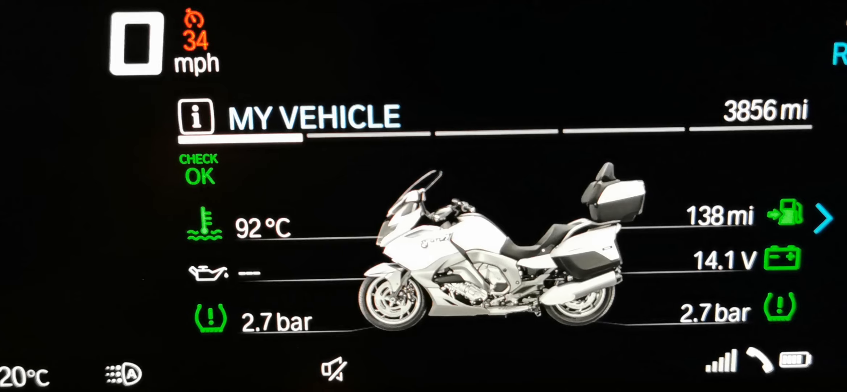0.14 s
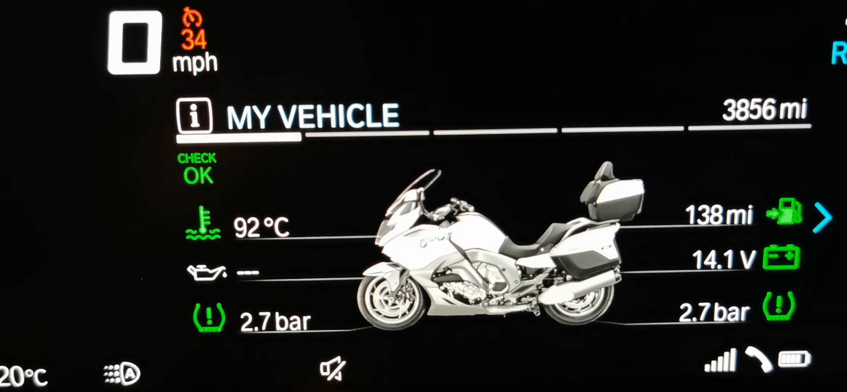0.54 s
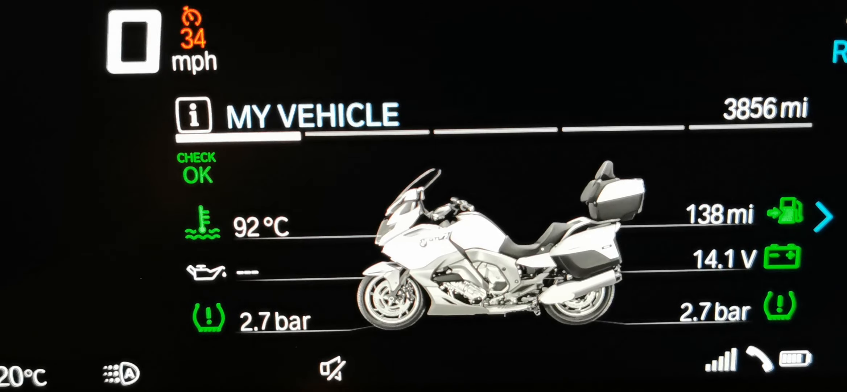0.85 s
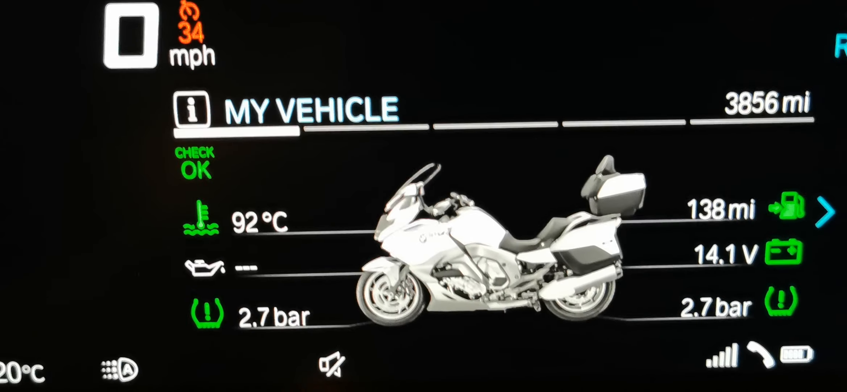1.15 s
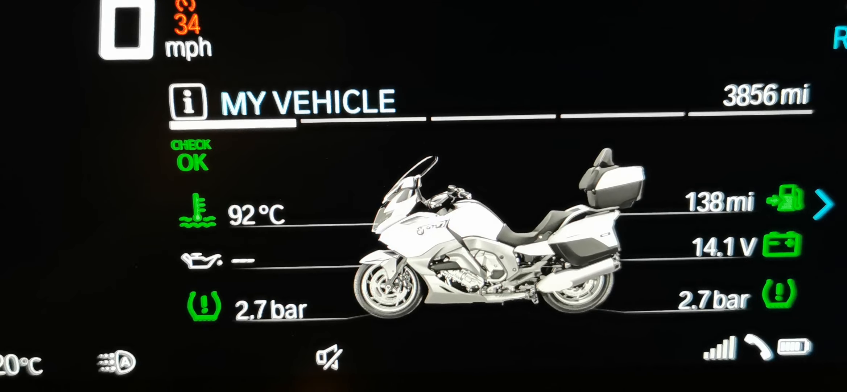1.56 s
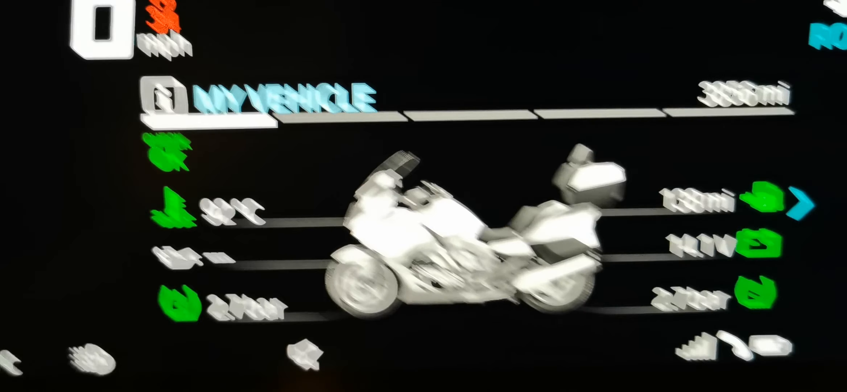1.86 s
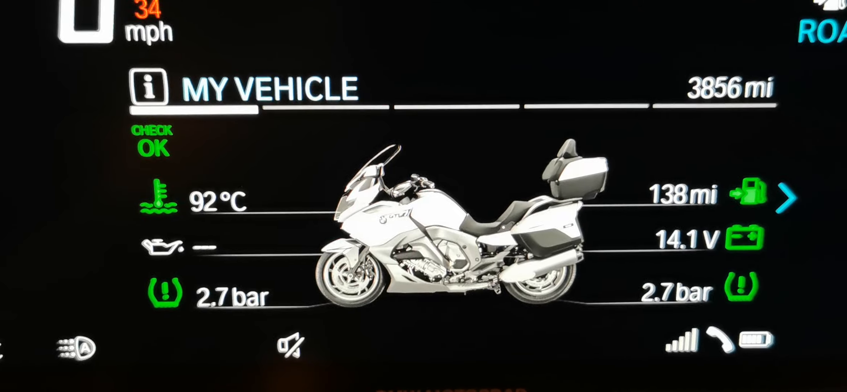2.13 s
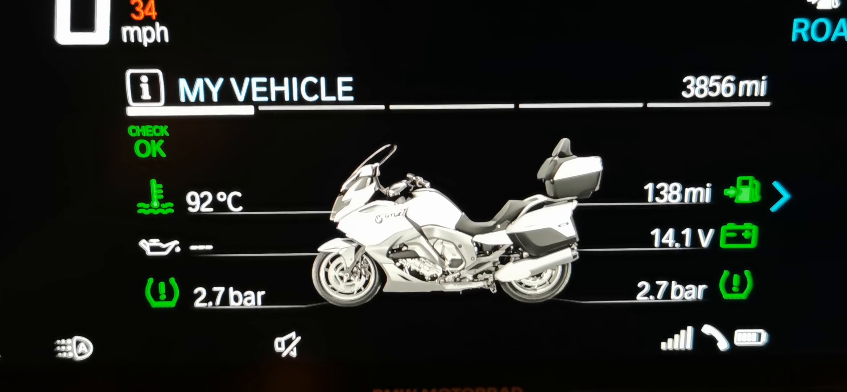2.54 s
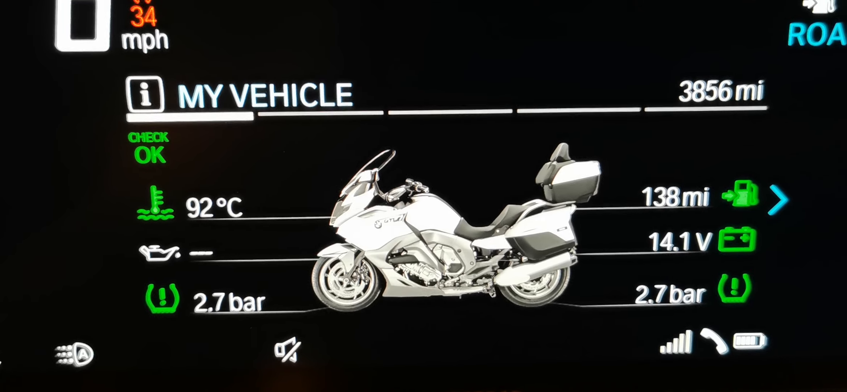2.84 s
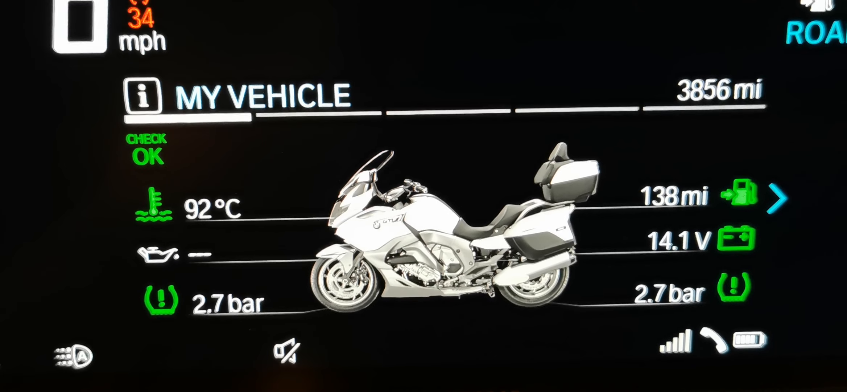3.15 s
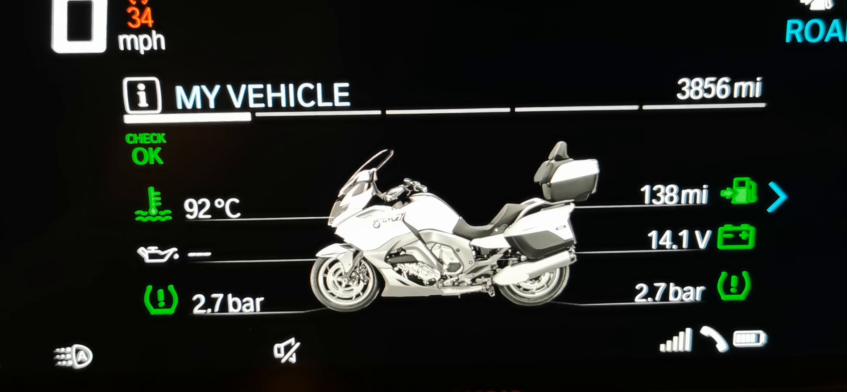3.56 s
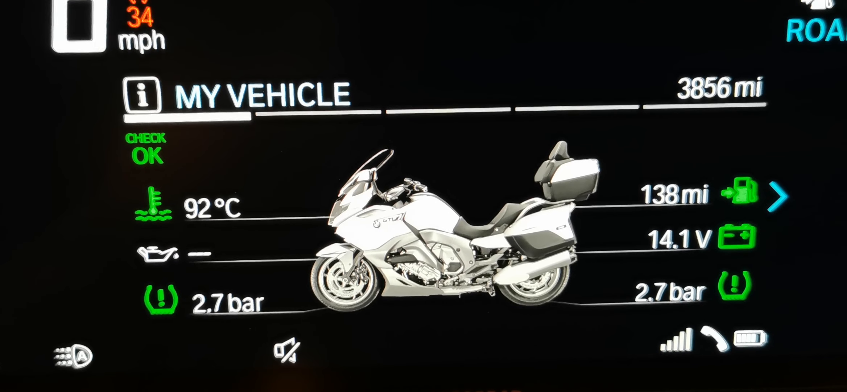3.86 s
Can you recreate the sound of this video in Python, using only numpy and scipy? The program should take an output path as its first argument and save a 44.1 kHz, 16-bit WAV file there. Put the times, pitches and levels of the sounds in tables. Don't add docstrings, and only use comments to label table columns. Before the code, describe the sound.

Silence until about 0.34 seconds, then a large six-cylinder motorcycle idle cuts in abruptly, already running. A smooth low exhaust hum fires about 45 times a second, with a hollow intake throb looping seven or eight times a second. Dense metallic valve rattle, soft injector ticks and gear whirr sit above. It is slightly louder from about 0.55, then drifts subtly closer and rightward after 1.4, idling steadily until 4 seconds.

```python
import sys
import numpy as np
from scipy import signal
from scipy.fft import rfft, irfft
from scipy.io import wavfile
from scipy.ndimage import uniform_filter1d

SR = 44100
rng = np.random.default_rng(int(sys.argv[2]) if len(sys.argv) > 2 else 0)


def magnitude_from_level(level_db):
    exponent = np.asarray(level_db, float) / 20
    return 10 ** exponent


def wav_record(signal):
    frames = np.transpose(np.atleast_2d(signal))
    bounded = np.clip(frames, -1, 1)
    quanta = np.round(bounded * 32767).astype(np.int16)
    wavfile.write(sys.argv[1], SR, quanta)


N = 176400
CYCLE_HZ, CYLINDERS = 7.4969, 6
PORT_LAG_S = .00028


def unit(x):
    return x / np.sqrt(np.mean(x ** 2))


def ring(x, hz, width_hz):
    return signal.lfilter(*signal.iirpeak(hz, hz / width_hz, fs=SR), x)


def walk(rate_hz):
    hold = int(SR / rate_hz)
    steps = np.repeat(rng.standard_normal(N // hold + 1), hold)
    smooth = uniform_filter1d(uniform_filter1d(steps, hold), hold)
    return unit(smooth[:N])


def curve(table, hz):
    table = np.array(table, float)
    return np.interp(np.log(hz + 1), np.log(table[:, 0] + 1), table[:, 1])


def sides(lean_db):
    return magnitude_from_level(np.array([lean_db / 2, -lean_db / 2]))


def ports(x, lean_db):
    return np.array([np.roll(x, int(PORT_LAG_S * SR)), x]) * sides(lean_db)[:, None]


# f/Hz, share/0-1
SHARED = [(30, 1), (400, .99), (750, .85), (1400, .75), (3000, .6), (6000, .45), (10000, .15)]


def pair(gate, hz, lag_s):
    right, own = rng.standard_normal((2, N))
    share = np.clip(curve(SHARED, hz), 0, 1)
    left = share * np.roll(right, int(lag_s * SR)) + np.sqrt(1 - share ** 2) * own
    return gate * np.array([left, right])


def firings(turns, cylinder_db, scatter_db, lead_s):
    count = np.floor(CYLINDERS * (turns + lead_s * CYCLE_HZ)).astype(int)
    at = np.flatnonzero(np.diff(count)) + 1
    level_db = np.array(cylinder_db)[count[at] % CYLINDERS]
    out = np.zeros(N)
    out[at] = magnitude_from_level(level_db + scatter_db * rng.standard_normal(len(at)))
    return out


def smear(x, rise_s, fall_s):
    t = np.arange(SR // 20) / SR
    shape = np.exp(-t / fall_s) * (1 - np.exp(-t / rise_s))
    return signal.fftconvolve(x, shape / shape.max())[:N]


KNOCK_DB = [-1.6, 0.11, -1, 0, -0.88, -.3]
# f/Hz, level/dB per Hz
WHIRR = [(25, -15), (250, -7), (600, -12), (1400, -16), (2500, -20.5), (6800, -29.5), (7700, -34),
         (15700, -36)]
# f/Hz, L-R/dB
WHIRR_LEAN = [(60, 13), (350, -17), (700, 4), (1290, -4), (2380, -7), (4400, -1), (8120, -0.5),
              (15000, -1.5)]


def whirr(turns):
    level_db, flicker_db = -28, 1
    hz = np.fft.rfftfreq(N, 1 / SR)
    tilt = magnitude_from_level(curve(WHIRR, hz)) * sides(curve(WHIRR_LEAN, hz))
    gate = 0.5 + 0.1 * smear(firings(turns, KNOCK_DB, 1.9, 0.0036), 0.00063, 0.0044)
    out = 0
    for centre_hz in 30 * 2. ** np.arange(10):
        band = np.clip(1 - np.abs(np.log2(hz / centre_hz + 1e-9)), 0, 1) ** .5
        spec = rfft(pair(gate, centre_hz, PORT_LAG_S))
        out = out + magnitude_from_level(flicker_db * walk(12)) * irfft(spec * band * tilt, N)
    return magnitude_from_level(level_db) * unit(out)


TICK_DB = [-8, -6.5, -4, -5.2, -2.5, -5.7]
# f/Hz, width/Hz, level/dB, L-R/dB
TICK_RINGS = [(3900, 70, -55.5, 0), (5124, 130, -56.5, -9.5), (5270, 2550, -53, -14.5),
              (8950, 1260, -54.5, 10.5), (10840, 890, -60, -5), (13300, 900, -54.5, -.7),
              (14600, 900, -59, -1)]


def injectors(turns):
    ticks = firings(turns, TICK_DB, scatter_db=2, lead_s=.0017)
    gate = smear(ticks, rise_s=.001, fall_s=.007)
    out = 0
    for hz, width_hz, db, lean_db in TICK_RINGS:
        hiss = pair(gate, hz, PORT_LAG_S)
        rung = ring(ring(hiss, hz, width_hz), hz, width_hz)
        out = out + magnitude_from_level(db) * sides(lean_db)[:, None] * unit(rung)
    return out


# f/Hz, width/Hz, level/dB, L-R/dB
CASING = [(557, 26, -43, -2), (664, 37, -36.5, -0.5), (742, 28, -41.5, 2), (860, 18, -44.5, -10),
          (928, 43, -50.5, -10), (1118, 26, -60, -6), (1824.4, 66, -36.5, -4.5), (1895, 59, -46.5, 3),
          (2010, 250, -44, -13), (2280, 45, -47, -16), (2685, 38, -44.5, 4), (3554, 120, -50, 0),
          (4450, 33, -51.5, -7), (6580, 210, -51, 4)]


def casing(turns):
    rattle_per_s, spread_db, drift_db = 1500, 1.5, .8
    knock_depth, knock_fall_s = .8, 0.0053
    hits = (rng.random(N) < rattle_per_s / SR) * magnitude_from_level(spread_db * rng.exponential(size=N))
    knocks = smear(firings(turns, KNOCK_DB, 1.6, 0.0014), .001, knock_fall_s)
    gate = uniform_filter1d(hits, size=12) * (3.5 + knock_depth * knocks)
    out = 0
    for hz, width_hz, db, lean_db in CASING:
        level = magnitude_from_level(db + drift_db * walk(2.33))
        strike = pair(gate, hz, PORT_LAG_S * rng.uniform(0.65, 1.5))
        out = out + level * sides(lean_db)[:, None] * unit(ring(strike, hz, width_hz))
    return out


# place in cycle/0-1, f/Hz, swell/s, fall/s, level/dB
BOOM = [
    (1, 355, 0.016, 0.0065, -19),
    (.27, 358, .016, 0.0023, -28),
    (.66, 407, 0.0037, 0.0045, -37),
]


def airbox(turns):
    scatter_db, jitter_s, glide_hz_per_s = 1.1, .00025, 800
    drone_db, drone_order, lean_db = -36, 48, 5
    out = 0
    for place, hz, swell_s, fall_s, db in BOOM:
        cycle = np.round(turns - place).astype(int)
        late, loud = rng.standard_normal((N // 4000, 2))[cycle - cycle.min()].T
        t = (turns - place - cycle) / CYCLE_HZ + jitter_s * late
        shape = 2 / (np.exp(-t / swell_s) + np.exp(t / fall_s))
        tone = np.cos(2 * np.pi * t * (hz + glide_hz_per_s * t / 2))
        out = out + magnitude_from_level(db + scatter_db * loud) * shape * tone
    drone = np.cos(2 * np.pi * drone_order * (turns - BOOM[0][0]))
    return ports(out + magnitude_from_level(drone_db + 2 * walk(11.25)) * drone, lean_db)


# f/Hz, width/Hz, level/dB
PIPE = [(74, 25, -7), (150, 8.4, -1.5), (185, 22.5, -4), (228, 56, -6.5), (257, 26, -2.5),
        (315, 17.6, -4.5), (415, 20, -0.5), (491.7, 33, -2)]


def pipe(x):
    out = 0
    for k, (hz, width_hz, db) in enumerate(PIPE):
        out = out + (-1) ** k * magnitude_from_level(db) * ring(ring(x, hz, width_hz), hz, 2 * width_hz)
    return unit(out)


# multiple of firing rate, level/dB
HUM = [(1, -14.5), (2, 0), (3, -13), (4, -4.5), (5, -8), (6, -14), (7, -15)]
PUFF_DB = [-1.5, -5.5, 1, -22, 0, 1.5]


def exhaust(turns):
    hum_db, puffs_db, rumble_db, lean_db = -28.5, -37, -32, 4
    sway_db, lope_db, lope_turn = .8, 1.2, .05
    flutter_db, wobble_rad, edge_rad = .8, .07, 0.82
    angle = 2 * np.pi * CYLINDERS * turns - edge_rad
    sway = sway_db * walk(5.9) + lope_db * np.cos(2 * np.pi * (turns - lope_turn))
    hum = 0
    for k, db in HUM:
        level = magnitude_from_level(db + sway + flutter_db * k ** .3 * walk(14))
        hum = hum - level * np.sqrt(2) * np.sin(k * (angle + wobble_rad * walk(12)))
    puffs = firings(turns, PUFF_DB, scatter_db=2, lead_s=-0.0018)
    uneven = puffs - (puffs > 0) * puffs[puffs > 0].mean()
    flow = rng.standard_normal(N)
    return ports(magnitude_from_level(hum_db) * hum + magnitude_from_level(puffs_db) * pipe(uneven) + magnitude_from_level(rumble_db) * pipe(flow), lean_db)


# t/s, closeness/dB, L-R/dB
HAND = [
    (.34, -4, -1.5),
    (.47, -4, -1),
    (.55, -1.5, 2),
    (1.4, -1.5, 2),
    (2.1, -0.7, -0.6),
    (2.8, -0.5, -0.9),
    (3.4, -0.55, -1.3),
    (4, -0.2, -1.3),
]


def scene():
    cycle_zero_s, wander_turns = .4870, 0.0029
    splice_s, splice_fade_s, splice_shift_s = .5, .14, .0435
    t = np.arange(N) / SR
    turns = (t - cycle_zero_s) * CYCLE_HZ + wander_turns * walk(3.904)
    hand = np.array(HAND)
    near_db = np.interp(t, hand[:, 0], hand[:, 1])
    lean_db = np.interp(t, hand[:, 0], hand[:, 2])
    rattle = magnitude_from_level(-.3 * lean_db + .6 * near_db) * casing(turns)
    bike = whirr(turns) + injectors(turns) + rattle + airbox(turns) + exhaust(turns)
    fade = np.clip(.5 + (t - splice_s) / splice_fade_s, 0, 1) * np.pi / 2
    earlier = np.roll(bike, int(splice_shift_s * SR), axis=1)
    bike = np.sin(fade) * bike + np.cos(fade) * earlier
    return bike * magnitude_from_level(near_db) * sides(lean_db)


def low_pass(x):
    return signal.sosfilt(signal.butter(12, 15690, fs=SR, output="sos"), x)


def record(dry):
    start_s, rise_s, roll_off_hz, top_hz = .3418, 0.00039, 15150, 15760
    on = np.clip((np.arange(N) / SR - start_s) / rise_s, 0, 1)
    soft = signal.sosfilt(signal.butter(8, roll_off_hz, fs=SR, output="sos"), dry * on)
    cut = signal.sosfilt(signal.ellip(8, .2, 70, top_hz, fs=SR, output="sos"), soft)
    return low_pass(cut)


dry = scene()
out = record(dry)
wav_record(out)
```